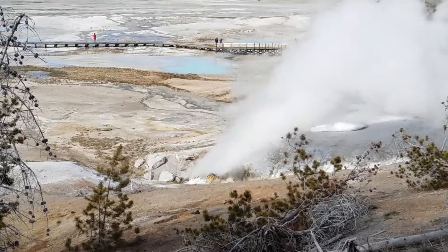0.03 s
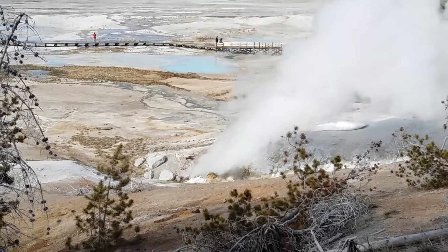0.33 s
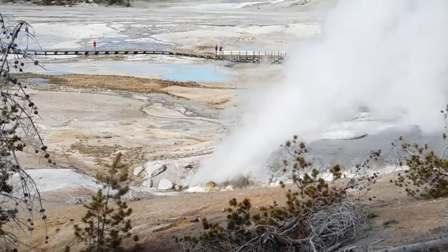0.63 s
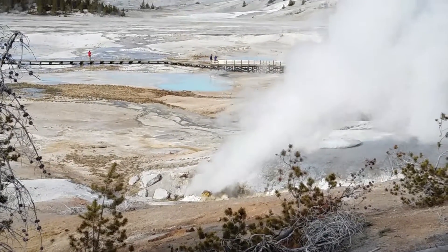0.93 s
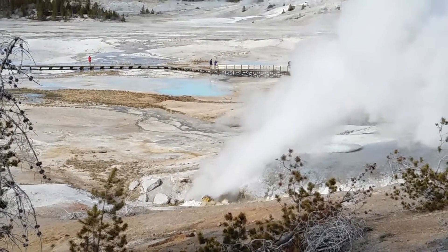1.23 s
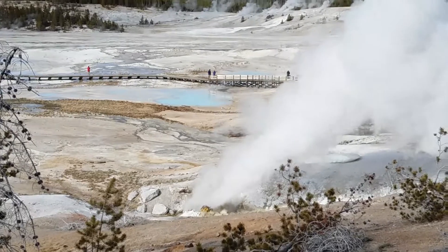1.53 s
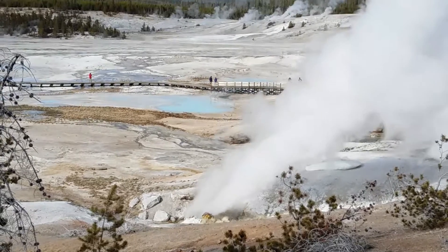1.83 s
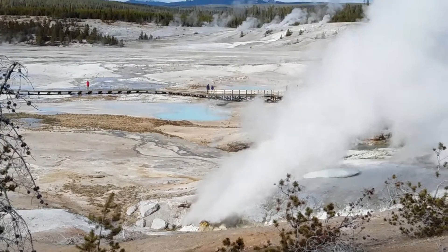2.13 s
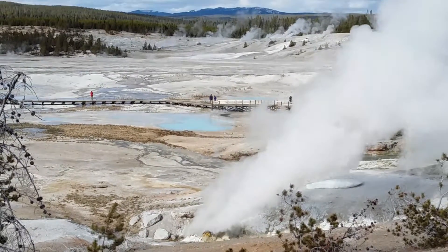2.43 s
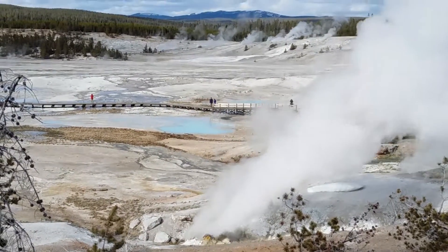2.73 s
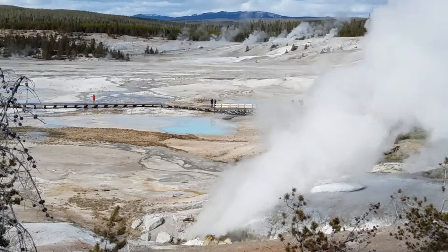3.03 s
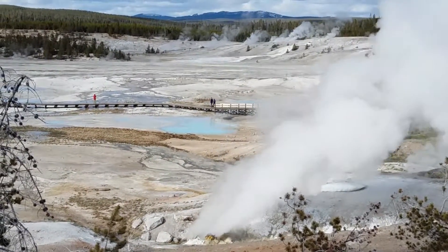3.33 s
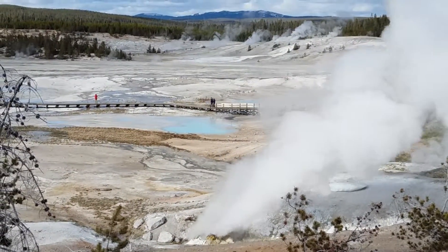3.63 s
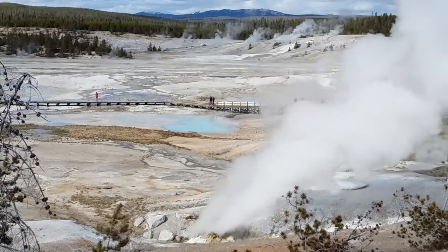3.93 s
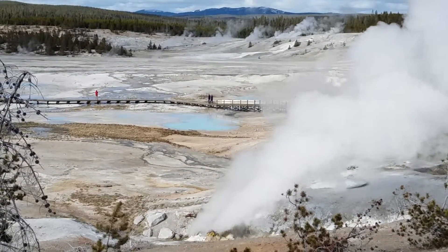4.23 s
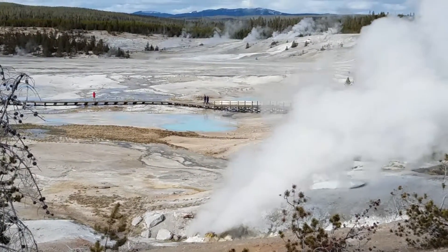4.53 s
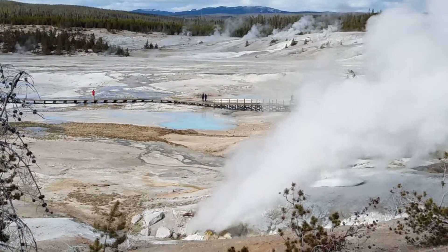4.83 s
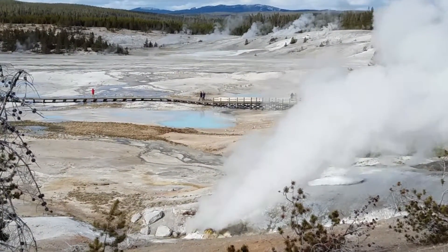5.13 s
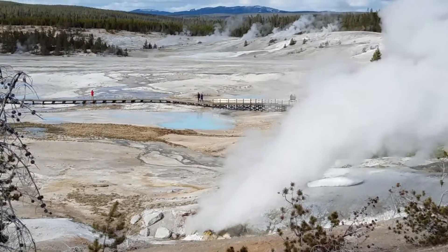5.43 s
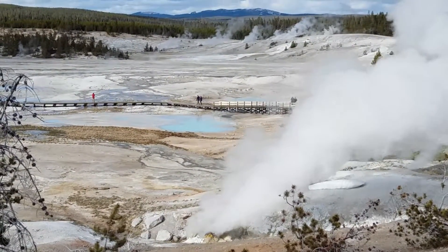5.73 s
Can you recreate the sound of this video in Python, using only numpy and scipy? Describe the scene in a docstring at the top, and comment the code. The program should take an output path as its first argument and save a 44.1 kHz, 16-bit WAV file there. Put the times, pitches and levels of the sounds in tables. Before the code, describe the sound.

Steam rumbles and hisses from a ground vent outdoors, swaying in a breeze, as someone takes a few soft, gritty steps.

```python
"""An open thermal basin, with a steam vent roaring steadily some way off.
Turbulence rumbles in its throat, the jet above it hisses, and light wind sways the treble.
The wind brushes two microphone ports, whose resonances colour the hiss; a faint fizz fades at the start.
Someone takes four soft steps on grit to the left, and a few faint ticks sound close by.
There is one sharp, dry click, like a digital glitch."""
import sys
import numpy as np
from scipy import signal
from scipy.fft import rfft, irfft
from scipy.io import wavfile
from scipy.ndimage import uniform_filter1d

SR = 44100
rng = np.random.default_rng(int(sys.argv[2]) if len(sys.argv) > 2 else 0)


def wrap_up_sound(samples):
    """Save the sound to the file named by the first command line argument, as 16-bit audio."""
    columns = np.atleast_2d(samples).T
    # keep every value between -1 and 1, then stretch to whole-number steps
    tamed = np.clip(columns, -1, 1)
    steps = np.round(tamed * 32767).astype(np.int16)
    wavfile.write(sys.argv[1], SR, steps)


N = 264159
TIME_S = np.arange(N) / SR
FRAME, HOP = 1024, 256  # samples
BIN_HZ = np.fft.rfftfreq(FRAME, 1 / SR)
FRAME_S = np.arange(N // HOP + 5) * HOP / SR
GRID = (len(FRAME_S), len(BIN_HZ))


def gain(db):
    """Decibels to amplitude."""
    return 10 ** (np.asarray(db) / 20)


def pan(left_db=0, right_db=0):
    """Channel gains as a column."""
    return gain([[left_db], [right_db]])


def unit_rms(x):
    """Scales to rms 1."""
    return x / np.sqrt(np.mean(x ** 2) + 1e-20)


def lookup(table, hz):
    """Value columns of a table, interpolated over log frequency."""
    knots_hz, *columns = np.transpose(table)
    return np.array([np.interp(np.log(hz + 1), np.log(knots_hz + 1), column) for column in columns])


def coloured(x, spectrum):
    """Filters x by a spectrum table, to rms 1."""
    response = gain(lookup(spectrum, np.fft.rfftfreq(N, 1 / SR))[0])
    return unit_rms(irfft(rfft(x) * response, N))


def bell(x, centre, width):
    """Gaussian of height 1, width at half height."""
    return 2 ** -((2 * (x - centre) / width) ** 2)


def wander(t, slow_hz, fast_hz, count=24):
    """Random drift of rms 1: sines of random phase between two rates."""
    rates_hz = np.geomspace(slow_hz, fast_hz, count)
    return unit_rms(sum(np.sin(2 * np.pi * (hz * t + rng.random())) for hz in rates_hz))


def burst(centre_s, length_s, level_db, pitch_hz, width_hz):
    """Short puff of noise around one pitch."""
    t = np.arange(-2048, 2048) / SR
    band = bell(np.fft.rfftfreq(len(t), 1 / SR), pitch_hz, width_hz)
    noise = irfft(rfft(rng.standard_normal(len(t))) * band)
    envelope = bell(t, 0, length_s)
    puff = envelope * noise / np.sqrt(np.average(noise ** 2, weights=envelope ** 2))
    return gain(level_db) * np.interp(TIME_S, round(centre_s * SR) / SR + t, puff, left=0, right=0)


# Throat spectrum: (frequency [Hz], relative density [dB])
THROAT_SPECTRUM = [(15, -40.5), (32, -37), (40, -33.5), (50, -20.5), (70, -6.5), (103, -5), (123, 1.5),
                   (160, -1.5), (200, -2), (220, -7), (300, -18), (370, -24), (430, -34.5), (800, -85)]
# Moments where the random low rumble swells briefly: (time [s], rise [dB])
RUMBLE_SWELLS = [(.64, 2.5), (1.52, 2.5), (3.07, 3.6), (5.71, 2)]


def throat_rumble(level_db=-32.5, throb_rms_db=0.65, swell_s=0.092):
    """Turbulence booms in the throat, wavering in level; its long waves reach both ports alike."""
    boom = coloured(rng.standard_normal(N), THROAT_SPECTRUM)
    boom /= np.sqrt(uniform_filter1d(boom ** 2, size=8000))  # steady pressure keeps the flow even
    throb_db = throb_rms_db * np.interp(TIME_S, FRAME_S, wander(FRAME_S, slow_hz=1.232, fast_hz=5))
    swell_db = sum(rise_db * bell(TIME_S, time_s, swell_s) for time_s, rise_db in RUMBLE_SWELLS)
    return boom * gain(level_db + throb_db + swell_db) * pan(left_db=-0.25)


# Left-right likeness: (frequency [Hz], coherence [0-1])
PORT_COHERENCE = [(400, .85), (650, .96), (1000, .94), (1230, .72), (1480, .83), (1590, .45), (1720, .96),
                  (1920, .96), (2120, .25), (2700, .88), (2860, .5), (3100, .86), (3750, .45), (4350, .9),
                  (5000, .56), (6900, .75), (8000, .25)]
# Left port's phase lead: (frequency [Hz], lead [rad])
PORT_LEAD = [(350, 0), (680, .55), (1060, .4), (1260, 1.5), (1530, .7), (1650, -2.2), (2030, -3.9),
             (2130, .2), (2420, -2), (2560, -.2), (2800, .8), (2920, -1.3), (3230, -.8), (3680, 2.4),
             (3820, 5.8), (4250, 9.5), (5500, 9.8), (6750, 12.5)]
# Port resonances, left and right: (frequency [Hz], width [Hz], boost [dB])
LEFT_RESONANCES = [(1490, 130, 7.5), (1770, 153, 16), (2860, 680, 6), (3610, 180, 3.5), (3840, 120, 3),
                   (4500, 317, 8), (5290, 350, 3), (5950, 350, 0.5), (6860, 350, 4)]
RIGHT_RESONANCES = [(1643, 336, 6.44), (2564, 390, 9.1), (3120, 220, 7.6), (4000, 290, 7), (4370, 500, 5.7),
                    (5400, 260, 3), (6000, 390, 3.8), (6920, 400, 7.2)]


def port_spectra():
    """Short-time spectra of one noise source at two resonant microphone ports, partly coherent."""
    left, independent = rng.standard_normal((2, *GRID)) + 1j * rng.standard_normal((2, *GRID))
    coherence = np.clip(lookup(PORT_COHERENCE, BIN_HZ), 0, 1)
    right = coherence * left + np.sqrt(1 - coherence ** 2) * independent
    right *= np.exp(-1j * lookup(PORT_LEAD, BIN_HZ))
    resonance_db = [sum(db * bell(BIN_HZ, hz, width_hz) for hz, width_hz, db in port)
                    for port in (LEFT_RESONANCES, RIGHT_RESONANCES)]
    return np.array([left, right]) * gain(resonance_db)[:, None]


# Jet spectrum: (frequency [Hz], left relative density [dB], right relative density [dB])
JET_SPECTRUM = [(152, -28, -28), (430, -10.5, -8.5), (503, -5.5, -4.5), (970, -2.5, 0), (1196, -11.5, -3),
                (2070, -19, -8), (2870, -16, -19.5), (3780, -18, -25), (5024, -18.5, -28), (5610, -32, -31),
                (6600, -35.5, -38), (7400, -42.5, -41.5), (8900, -54, -52.5), (14000, -71.5, -75.5)]
# Swell as the wind carries the hiss, before weighting: (time [s], swell [dB])
WIND_SWELL = [(0.08, -0.3), (0.42, 3.5), (0.85, -0.7), (1.05, 0.9), (1.42, -2.4), (1.72, 2.2), (1.97, 1.2),
              (2.13, -2), (2.55, 0.8), (3.14, -1), (3.69, 2.5), (4.05, -1.6), (4.24, 0.6), (4.55, 0.5),
              (4.85, -2), (5.08, -1.9), (5.36, 0.6), (5.95, -2)]
# Swell weighting, short waves most: (frequency [Hz], weight [dB/dB])
SWELL_WEIGHT = [(700, 0.5), (1400, 0.97), (2500, 1.2), (4000, 1.33), (6500, 1.46)]


def jet_hiss(level_db=-42.5, eddy_db=0.71, flutter_db=0.32,
             brighten_db_per_s=1.08, bright_hz=5200, bright_width_hz=4500):
    """Mixing noise of the jet: eddies flutter it, wind sways it, and the treble slowly opens up."""
    eddies = uniform_filter1d(rng.standard_normal(GRID), size=9, axis=0)  # smooth in time
    eddies = unit_rms(uniform_filter1d(eddies, size=18, axis=1))  # and in frequency
    flutter = unit_rms(uniform_filter1d(rng.standard_normal(len(FRAME_S)), size=4))[:, None]
    swell = np.interp(FRAME_S, *np.transpose(WIND_SWELL))
    sway_db = np.outer(swell, lookup(SWELL_WEIGHT, BIN_HZ)[0])
    treble = bell(BIN_HZ, bright_hz, bright_width_hz)
    bright_db = brighten_db_per_s * np.outer(FRAME_S - FRAME_S.mean(), treble)
    motion_db = eddy_db * eddies + flutter_db * flutter + sway_db + bright_db
    colour_db = lookup(JET_SPECTRUM, BIN_HZ)[:, None]
    spectra = np.swapaxes(port_spectra() * gain(colour_db + motion_db), 1, 2)
    _, hiss = signal.istft(spectra, nperseg=FRAME, noverlap=FRAME - HOP)
    return gain(level_db) * unit_rms(hiss[:, :N])


# Wind on the ports: (frequency [Hz], relative density [dB])
BREEZE_SPECTRUM = [(15, -19), (40, -13), (85, 4.5), (140, 8), (200, 1.5), (260, -8.5), (370, 6.5),
                   (450, -35)]


def breeze(level_db=-58.5):
    """Light wind brushes each port independently."""
    return gain(level_db) * coloured(rng.standard_normal((2, N)), BREEZE_SPECTRUM)


def fizz(level_db=-77, half_fall_s=0.17):
    """Faint high fizz that fades from the start."""
    spectrum = [(5000, -40), (7800, 0), (10000, -4), (13000, -18)]  # (frequency [Hz], density [dB])
    envelope = bell(TIME_S, 0, 2 * half_fall_s)
    return gain(level_db) * envelope * coloured(rng.standard_normal((2, N)), spectrum)


# Steps: (heel-down time [s], roll length [s], grit level [dB], heel level [dB])
FOOTFALLS = [(.357, 0.15, -49, -39), (.985, 0.24, -54, -58), (1.595, 0.17, -50, -42),
             (2.295, 0.093, -56, -46)]
# Grit crunch: (frequency [Hz], relative density [dB])
GRIT_SPECTRUM = [(600, -31.5), (1300, -5.5), (2000, 2), (2600, 9.5), (3100, -3), (3600, -18.5),
                 (4800, -1.5), (6000, -32.5), (9000, -47)]


def footsteps(grains_per_s=1800, spread_db=3, heel_hz=750, heel_width_hz=500, heel_s=0.01434):
    """The heel lands with a dull scuff, then the sole rolls over many small grains."""
    hits = rng.random((3, N)) < grains_per_s / SR  # streams: left, right, shared
    grains = hits * np.sign(rng.standard_normal((3, N)))
    grains *= gain(spread_db * np.minimum(rng.exponential(1, grains.shape), 4))
    crunch = coloured(grains[:2] + grains[2], GRIT_SPECTRUM)
    roll, heels = np.zeros((2, N))
    for time_s, roll_s, grit_db, heel_db in FOOTFALLS:
        progress = np.clip((TIME_S - time_s) / roll_s, 0, 1)
        roll += gain(grit_db) * np.sqrt(np.sin(np.pi * progress).clip(0))
        heels += burst(time_s + heel_s / 2, heel_s, heel_db, heel_hz, heel_width_hz)
    return (crunch * roll + heels) * pan(right_db=-4)


# Stones under the shoe: (time [s], level [dB], pitch [Hz])
STONE_CRACKS = [(0.447, -50, 1900), (1.001, -41.5, 2500), (1.036, -49, 2300), (1.107, -45, 2450),
                (1.151, -40.5, 2600), (1.607, -43, 2320), (1.675, -43.5, 1800), (1.724, -50, 2250),
                (1.746, -42, 2720), (2.307, -46, 2200), (2.331, -51, 1710), (2.369, -49, 1510)]


def stones(length_s=0.0056, width_hz=1200):
    """Larger stones give way one by one with a short crack."""
    cracks = sum(burst(time_s, length_s, db, hz, width_hz) for time_s, db, hz in STONE_CRACKS)
    return cracks * pan(right_db=-5)


def click(time_s=1.4233, level_db=-32.5, decay_s=0.00038):
    """One sharp, dry click, like a digital glitch: a sudden jump that dies at once."""
    age_s = (np.arange(N) - round(time_s * SR)) / SR
    pulse = (age_s >= 0) * np.exp(-abs(age_s) / decay_s)
    return gain(level_db) * pulse * pan(left_db=-3)


# Nearby ticks: (time [s], length [s], level [dB], pitch [Hz], width [Hz])
NEAR_TICKS = [(2.3675, 0.0039, -45, 4690, 350), (2.411, 0.0063, -52, 4740, 500),
              (2.412, .006, -65, 6950, 1290)]


def ticks():
    """Short, softly pitched ticks a little to the left."""
    return sum(burst(*tick) for tick in NEAR_TICKS) * pan(right_db=-7)


def scene():
    """The vent in open air, with no walls to echo it, plus the smaller sounds."""
    return throat_rumble() + jet_hiss() + breeze() + fizz() + footsteps() + stones() + click() + ticks()


def record(dry, floor_db=-79, cutoff_hz=15800):
    """Microphone hiss, then the band limit."""
    noisy = dry + gain(floor_db) * rng.standard_normal(dry.shape)
    lowpass = signal.firwin(511, cutoff_hz, window=("kaiser", 9), fs=SR)
    return signal.oaconvolve(noisy, lowpass[None], "same")


dry = scene()
out = record(dry)
wrap_up_sound(out)
```